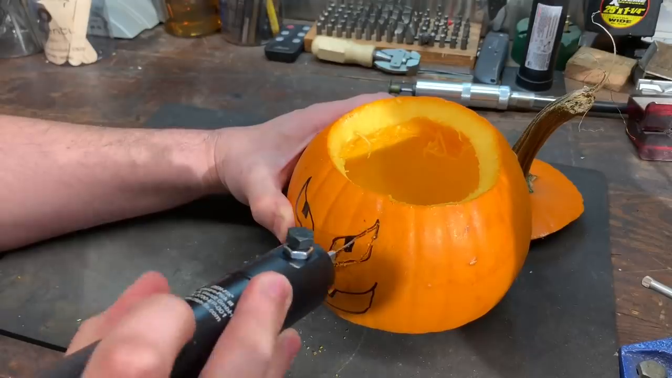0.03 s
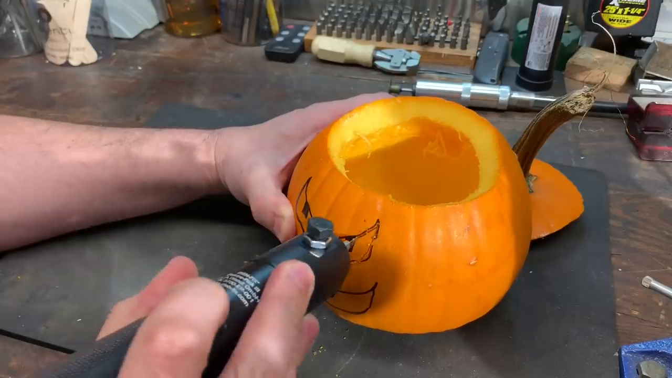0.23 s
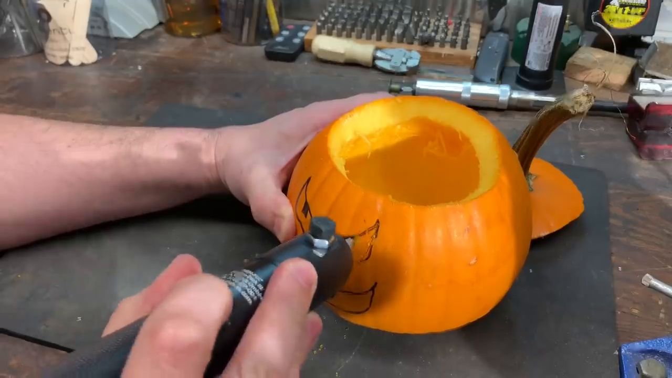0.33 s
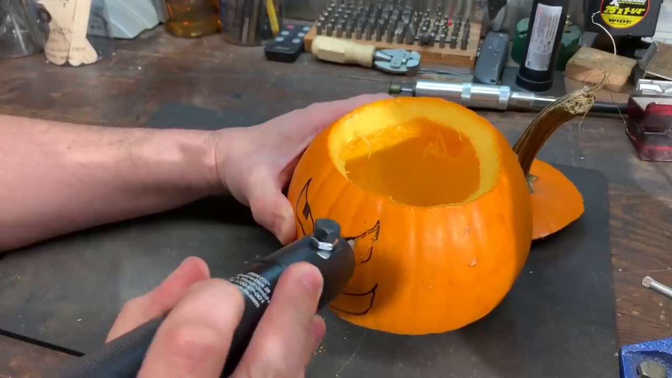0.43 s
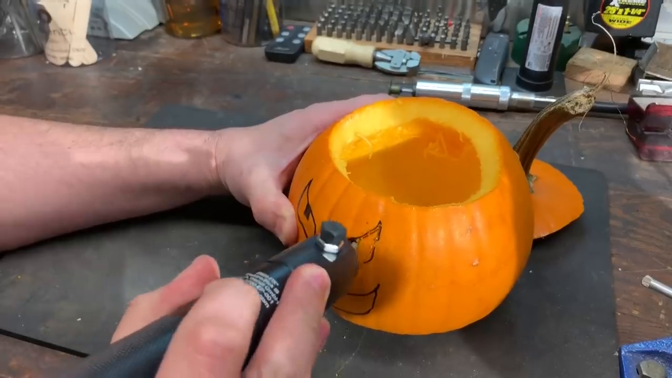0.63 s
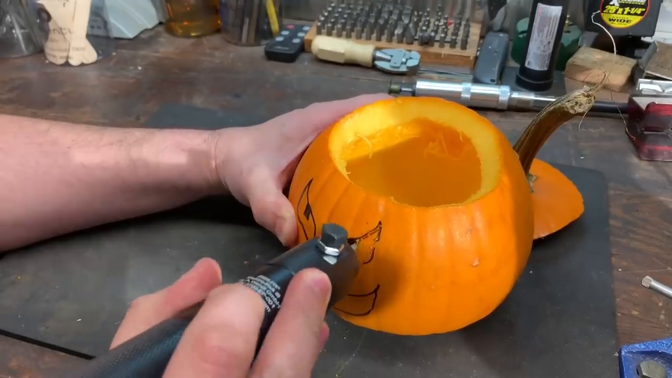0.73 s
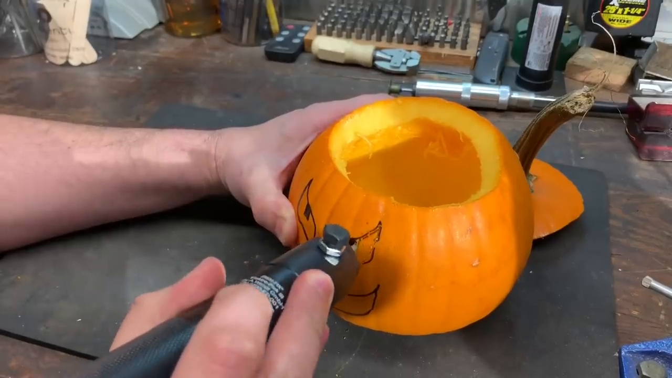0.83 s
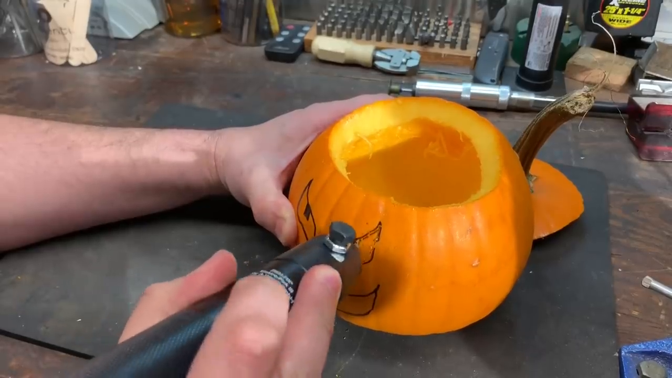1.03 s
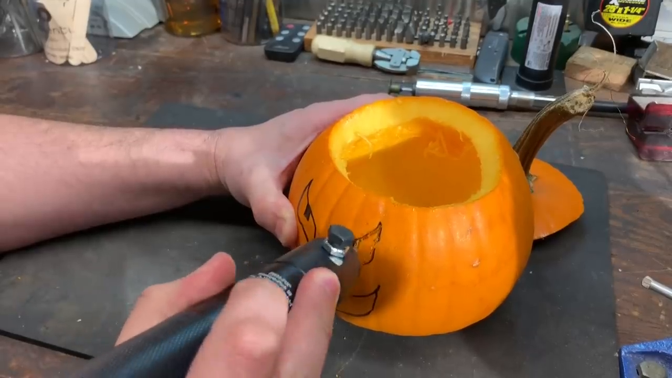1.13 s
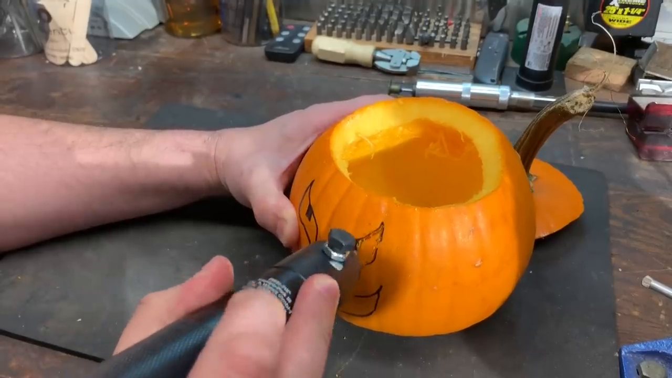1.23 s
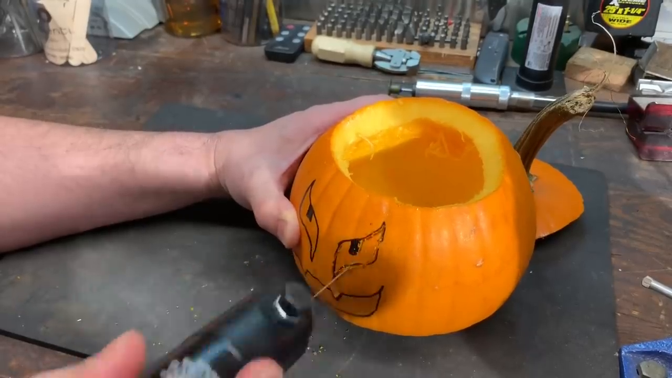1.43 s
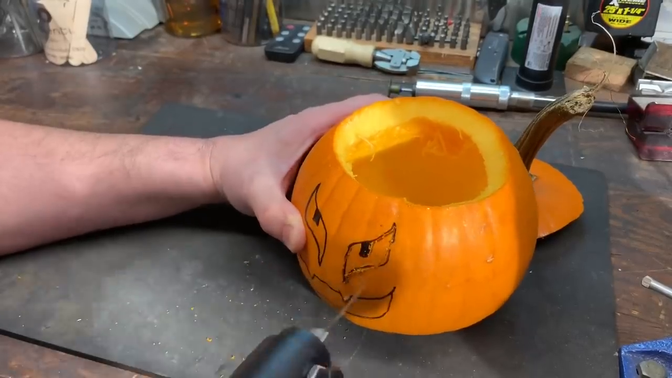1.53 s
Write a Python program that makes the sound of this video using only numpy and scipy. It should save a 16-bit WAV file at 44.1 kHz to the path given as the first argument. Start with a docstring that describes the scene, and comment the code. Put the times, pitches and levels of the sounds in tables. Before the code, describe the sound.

An electric pick gun buzzes and rattles for one second, its needle hammering into a hollow pumpkin.

```python
"""Electric pick gun in a pumpkin

An electric pick gun runs for one burst in a quiet workshop, its needle pressed into a pumpkin.
The striker mostly rattles loosely; three times it locks into a steady, higher, pitched buzz.
Rows of clicks and noise ring the plastic body, the steel needle and the hollow gourd; the steady
buzz is a sum of cosines. Mains hum, room noise, a hand rustle and a lingering low note lie below."""
import sys
import numpy as np
from scipy import signal
from scipy.fft import rfft, irfft, next_fast_len
from scipy.io import wavfile
from scipy.ndimage import uniform_filter1d

SR = 44100
rng = np.random.default_rng(int(sys.argv[2]) if len(sys.argv) > 2 else 0)


def transcribe(u):
    """Save the signal u as a 16-bit wav file named by the first command-line argument.

    u: samples, shape (n,) or (channels, n), limited to [-1, 1]; the rate is SR.
    q: integer samples, one column per channel.
    """
    v = np.clip(np.atleast_2d(u).T, -1, 1)
    q = np.round(v * 32767).astype(np.int16)
    wavfile.write(sys.argv[1], SR, q)


N = 68355

# resonances of the plastic body: f/Hz, width/Hz, level/dB
BODY = [(611, 25.7, 3.5), (796, 95, -8), (971, 113, 1.5), (1215, 81, 2.5), (1521, 119, 4),
        (2050, 230, -1.5), (2330, 278, -5), (2760, 720, -12), (3115, 160, -10)]
# resonances of the steel needle, the last one topmost: f/Hz, width/Hz, level/dB
NEEDLE = [(3484, 1900, -9), (4580, 1240, -5), (5974, 454, 1.5), (6730, 640, -2.5), (8240, 810, -3),
          (8970, 520, 0), (13630, 4000, -10.5)]
STOP_S = 1.235   # the trigger is let go
UPPER_RING_HZ = 7400   # the needle's upper resonances start here
NEEDLE_WANDER_DB = 2   # slow wander of most needle resonances


def amp(db):
    """Turn decibels into a factor on the wave."""
    return 10 ** (np.asarray(db) / 20)


def rms_one(x):
    """Scale a sound to an average (rms) strength of 1."""
    return x / np.sqrt(np.mean(x ** 2) + 1e-20)


def in_time(rows, before=None, after=None):
    """Draw straight lines between table rows, giving one curve per column after the time."""
    s, *columns = np.transpose(rows)
    return [np.interp(np.arange(N) / SR, s, c, before, after) for c in columns]


def noise():
    """White noise: every pitch equally strong."""
    return rng.standard_normal(N)


def drift(rate_hz):
    """Slow random wandering of rms 1: noise smoothed twice."""
    r = np.exp(-2 * np.pi * rate_hz / SR)
    slow = signal.lfilter([1], [1, -2 * r, r * r], rng.standard_normal(N + SR))
    return rms_one(slow[SR:])   # the first second lets the filter settle


def resonance(x, hz, width_hz):
    """One part that rings at its own pitch; a narrower width rings longer."""
    r = np.exp(-np.pi * width_hz / SR)
    feedback = [1, -2 * r * np.cos(2 * np.pi * hz / SR), r * r]
    return signal.lfilter([(1 - r * r) / 2, 0, (r * r - 1) / 2], feedback, x + 1e-18)


def ring(x, table, wander_db=0):
    """Resonances side by side, signs alternating, each able to wander slowly in level."""
    total = np.zeros(N)
    for k, (hz, width_hz, db) in enumerate(table):
        level = amp(db + wander_db * drift(9.0))
        total += (-1) ** k * level * resonance(x, hz, width_hz)
    return total


def sliding(x, hz, width_hz):
    """A resonance whose centre moves: shift it to zero, low-pass, shift back."""
    spin = np.exp(2j * np.pi * np.cumsum(hz) / SR)
    r = np.exp(-np.pi * width_hz / SR)
    return 2 * np.real(spin * signal.lfilter([1 - r], [1, -r], x / spin))


def evened(x):
    """Even out the loudness: divide by the level over a short time."""
    even_s = 0.016
    power = uniform_filter1d(x ** 2, int(even_s * SR))
    return x / np.sqrt(power + 1e-3 * np.mean(x ** 2))


def clicks(at, sizes):
    """Clicks placed between samples, each a short windowed sinc; at is counted in samples."""
    out, taps = np.zeros(N + 16), np.arange(-7, 9)
    keep = (at > 8) & (at < N)
    whole = np.floor(at[keep])[:, None]
    off = taps - (at[keep][:, None] - whole)
    shape = np.sinc(off) * np.cos(np.pi * off / 16) ** 2
    np.add.at(out, (whole + taps).astype(int), sizes[keep][:, None] * shape)
    return out[:N]


def room_noise():
    """Steady room noise: white noise weighted by pitch."""
    # spectrum before scaling: f/Hz, level per Hz/dB
    room_curve = [(12, 1), (22, -6), (45, -8.5), (95, -6.5), (135, -7.5), (200, -23), (330, -20.5),
                  (600, -22.5), (1000, -25.5), (2500, -34.5), (5000, -49), (11000, -69.5)]
    hz, db = np.transpose(room_curve)
    f = np.maximum(np.arange(N // 2 + 1) * SR / N, 1)
    weight = amp(np.interp(np.log(f), np.log(hz), db))
    return amp(-64) * rms_one(irfft(rfft(noise()) * weight, N))


def mains_hum():
    """Steady tones of mains hum, each a sine with a random start."""
    # f/Hz, rms level/dB
    hum_tones = [(240, -77), (480, -85), (720, -87.5), (960, -87), (2640, -87)]
    t = np.arange(N) / SR
    hum = np.zeros(N)
    for hz, db in hum_tones:
        hum += amp(db) * np.sqrt(2) * np.sin(2 * np.pi * (hz * t + rng.random()))
    return hum


def lingering_note():
    """A low note lingers after the burst: noise through two narrow resonances."""
    # t/s, level/dB
    fade = [(1.26, -46), (1.422, -62), (1.462, -59), (1.55, -65)]
    hz, width_hz = 140, 12
    drone = resonance(resonance(noise(), hz, width_hz), hz, 3 * width_hz)
    return amp(in_time(fade, -120)[0]) * rms_one(drone)


def hand_rustle():
    """The hand shifts on the tool: noise through two wandering resonances."""
    # swell and fade: t/s, level/dB
    swell = [(0.0, -82), (0.074, -67), (0.2, -98)]
    # resonances: f/Hz, width/Hz, level/dB
    rustle_rings = [(874, 150, -6), (1450, 130, 0)]
    rustle = rms_one(ring(noise(), rustle_rings, wander_db=3.5))
    return amp(in_time(swell, None, -120)[0]) * rustle


def shop(x):
    """Echoes of the workshop: eight feedback delays, duller on every round."""
    t60_s, wall_cut_hz = 0.12, 22000   # time to die away by 60 dB; treble cut of each round
    size = next_fast_len(N + SR)
    w = 2 * np.pi * np.arange(size // 2 + 1) / size
    dull = 1 / (1 + 1j * w * SR / (2 * np.pi * wall_cut_hz))
    echoes = 0
    for k, lag_s in enumerate(np.geomspace(.011, .031, 8)):
        one_round = amp(-60 * lag_s / t60_s) * dull * np.exp(-1j * w * lag_s * SR)
        echoes = echoes + (-1) ** k * one_round / (1 - one_round)
    return irfft(rfft(x, size) * echoes, size)[:N]


def striker():
    """Rate of blows and looseness (0 in step, 1 rattling) over time."""
    # one table per steady spell: t/s, blow rate f/Hz
    spells = [
        [(0.31, 379.9), (0.322, 391.3), (0.376, 388.2)],
        [(0.604, 360.2), (0.636, 375.4), (0.682, 362.5), (0.74, 367), (0.768, 346.1), (0.83, 343.7),
         (0.862, 349.2), (0.906, 337.5), (1.0, 341.4), (1.02, 324.1)],
        [(1.186, 401.6), (1.202, 405.2), (1.21, 390.7)],
    ]
    rattle_hz, run_down_hz_per_s = 241.72, 3100
    glide_s = .03   # the rate glides to and from a spell
    lock_in_s, loosen_s = 0.029, 0.014   # time to fall into step, and to lose it
    t = np.arange(N) / SR
    rows, distances = [], []
    for spell in spells:
        start, end = spell[0][0], spell[-1][0]
        rows += [(start - glide_s, rattle_hz), *spell, (end + glide_s, rattle_hz)]
        distances.append(np.maximum((start - t) / lock_in_s, (t - end) / loosen_s))
    hz, = in_time(rows)
    hz = np.maximum(hz - run_down_hz_per_s * np.maximum(t - STOP_S, 0), 60)
    return hz, np.clip(np.min(distances, axis=0), 0, 1)


def blows(cycles, hz, loose):
    """One blow and one rebound a cycle, uneven in timing when loose."""
    steady_jitter, loose_jitter = .0015, .15   # timing error as share of a cycle; the second adds on
    uneven_db, clump_db, clump_hz = .7, 0.96, 70   # chance in strength; drifting strength when loose
    bounce_lag, bounce_wander, bounce_db = .4, 0.024, -5.5   # lag and its wander as share of a cycle
    at = np.interp(np.arange(1, int(cycles[-1])), cycles, np.arange(N))
    i = at.astype(int)
    chance = rng.standard_normal((len(at), 4))
    period = SR / hz[i]
    jitter = steady_jitter + loose_jitter * loose[i]
    clump = clump_db * loose[i] * drift(clump_hz)[i]
    first = at + period * jitter * chance[:, 0]
    lag = bounce_lag + bounce_wander * drift(5.2)[i] + jitter * chance[:, 1]
    strikes = clicks(first, amp(clump + uneven_db * chance[:, 2]))
    rebounds = clicks(first + period * lag, amp(clump + bounce_db + uneven_db * chance[:, 3]))
    return strikes + rebounds


def gritty(hits, loose):
    """Each blow trails a short scrape of noise; loose blows and the run-down add a steady rub."""
    decay_s, steady_share, loose_share = 0.00091, .33, .8   # scrape decay; its share in step and loose
    rub_share, coast_s = .33, 0.14   # rub when loose; time in which it takes over after the stop
    r = np.exp(-1 / (decay_s * SR))
    scrape = rms_one(signal.lfilter([1], [1, -r], np.abs(hits)) * noise())
    share = np.clip(steady_share + (loose_share - steady_share) * loose, 0, 1)
    since_stop_s = np.maximum(np.arange(N) / SR - STOP_S, 0)
    rub = np.clip(rub_share * loose + since_stop_s / coast_s, 0, 1)
    struck_part = np.sqrt(1 - share ** 2) * rms_one(hits) + share * scrape
    return np.sqrt(1 - rub ** 2) * struck_part + rub * noise()


def gourd_thump(turn, loose):
    """The motor's turning shakes the gourd: a low tone, its strength noisy when loose."""
    noise_share, width_hz, low_cut_hz = .9, 40, 85
    smooth = signal.butter(2, width_hz, fs=SR, output="sos")
    shake = rms_one(signal.sosfilt(smooth, noise()))
    low_cut = signal.butter(4, low_cut_hz, "high", fs=SR, output="sos")
    return rms_one(signal.sosfilt(low_cut, turn * (1 + noise_share * loose * shake)))


def gourd_hollow(hits):
    """The blows ring the hollow gourd through two resonances at one pitch."""
    hz, width_hz = 236, 107
    return rms_one(resonance(resonance(evened(hits), hz, width_hz), hz, 2 * width_hz))


def needle_rings(rough, loose):
    """Lower and upper ring of the steel needle, driven by blows and, in step, extra rubbing."""
    # the brightest ring slides as the needle is pressed, the topmost swells and fades:
    # t/s, brightest ring f/Hz, topmost ring level/dB
    slide = [(0.6, 10000, 1), (0.64, 9300, 0), (0.686, 10870, -4), (0.76, 9900, 2.5), (0.86, 10100, 1),
             (0.9, 10100, -6.5), (1.0, 10340, -3.5), (1.04, 9760, 0.5)]
    slide_width_hz, slide_db = 770, 0.5
    rub = (1 - loose) * noise()
    low_modes = [m for m in NEEDLE if m[0] < UPPER_RING_HZ]
    lower = rms_one(ring(rough + .3 * rub, low_modes, wander_db=NEEDLE_WANDER_DB))
    rubbed = rough + .45 * rub
    slide_hz, top_db = in_time(slide)
    bright = amp(slide_db) * sliding(rubbed, slide_hz, slide_width_hz)
    top = amp(top_db) * ring(rubbed, NEEDLE[-1:])
    high_modes = [m for m in NEEDLE[:-1] if m[0] >= UPPER_RING_HZ]
    upper = bright + top + ring(rubbed, high_modes, wander_db=NEEDLE_WANDER_DB)
    return lower, rms_one(upper)


def struck(times, db, table):
    """Single blows, each a short crunch ringing the resonances to about a given peak level."""
    decay_s, noise_share = 0.0018, .35   # noise after the first contact
    n = SR // 100
    tail = noise_share * rng.standard_normal(n) * np.exp(-np.arange(n) / (decay_s * SR))
    crunch = np.r_[1, tail]
    unit_peak = np.abs(ring(np.r_[crunch, np.zeros(N - len(crunch))], table)).max()
    return ring(np.convolve(clicks(times * SR, amp(db)), crunch)[:N], table) / unit_peak


def hard_knocks():
    """Hard single blows ring needle and body together."""
    # t/s, peak level of the needle/dB, peak level of the body/dB
    knocks = [(0.219, -37.5, -39), (0.2423, -14, -12), (0.2553, -19, -22), (0.2667, -22.5, -48),
              (0.2867, -14.5, -16.5), (0.4385, -14, -24), (0.4766, -12, -18), (0.5104, -16.5, -26.5),
              (0.5308, -31, -20), (0.5594, -17.5, -21), (1.0309, -16.5, -13), (1.0839, -19, -25),
              (1.1210, -21, -18), (1.1124, -19, -21.5), (1.1415, -18, -26)]
    s, steel_db, plastic_db = np.transpose(knocks)
    return struck(s, steel_db, NEEDLE) + struck(s, plastic_db, BODY)


def last_ticks():
    """Last bright ticks as the motor runs down: crunches through two resonances at one pitch."""
    # t/s, peak level before the second resonance/dB
    ticks = [(1.2246, -19.5), (1.242, -37), (1.2458, -30), (1.2514, -25), (1.2572, -24.5), (1.2632, -28),
             (1.2726, -27), (1.2844, -55.5)]
    hz, width_hz = 9300, 500
    s, db = np.transpose(ticks)
    return resonance(struck(s, db, [(hz, width_hz, 0)]), hz, 4 * width_hz)


def steady_buzz(cycles):
    """Clean multiples of the blow rate, weighted by the grip; rms about 1."""
    # one row per grip, columns are multiples 1 to 9 of the blow rate: level/dB
    grips = [(-14, -6.5, 1.7, 2.5, -3.5, -13, -30.5, -23, -41.5),
             (-10.5, -4, -2, -4, -7, -11.5, -21, -19, -21),
             (-6.5, -8, 0.5, -7.5, -9.5, -8.5, -9.5, -22, -12.5),
             (-8, -21, -1, -9.5, -3, -10, -14, -20, -15.5), (-28.5, -7, 0, -6, -9, -20, -30.5, -23, -35)]
    # one value per grip: phase lag/rad, growing with the multiple squared
    grip_lag = [0.4, 0.706, .8, .9, 0.334]
    changes_s, change_s = [.5, 0.756, 0.904, 1.1], 0.025   # when the grip changes, how long it takes
    waver_db, flutter_db, flutter_hz = 1.5, 0.46, 70   # slow waver; fast flutter, more on high multiples
    edges = np.ravel([(s - change_s / 2, s + change_s / 2) for s in changes_s])
    # each grip holds from the end of one change to the start of the next
    held = np.repeat(np.c_[grip_lag, grips], 2, axis=0)[1:-1]
    smear, *levels = in_time(np.c_[edges, held])
    gains = np.array([amp(db + waver_db * drift(6.6) + flutter_db * k * drift(flutter_hz))
                      for k, db in enumerate(levels)])
    k = np.arange(len(gains))[:, None] + 1
    waves = gains * np.cos(2 * np.pi * k * cycles - smear * k ** 2)
    return np.sum(waves, axis=0) / np.sqrt(np.sum(gains ** 2, axis=0) / 2)


def body_clatter(rough, cycles, loose):
    """The plastic body: steady buzz while in step, ringing clatter while loose."""
    grit_db, rub_level = -20.5, 0.69   # clatter left under the buzz; rubbing noise in step
    driven = rough + rub_level * (1 - loose) * noise()
    clatter = np.sqrt(loose + amp(2 * grit_db)) * rms_one(ring(driven, BODY))
    return np.sqrt(1 - loose) * steady_buzz(cycles) + clatter


def pick_gun():
    """The striker's blows heard through body, needle and gourd."""
    # t/s, then level/dB of body, needle's lower ring, its upper ring, gourd's thump, its hollow note
    effort = [(0.2, -136, -99, -99, -103, -104), (0.218, -46, -66, -58, -35.5, -50.5),
              (0.248, -22.5, -31, -35.5, -38.5, -35), (0.36, -16.5, -38.5, -33.5, -55, -61),
              (0.386, -20, -29, -29.5, -57, -36), (0.412, -21.5, -31.5, -32, -43.5, -34.5),
              (0.568, -26.5, -39.5, -36.5, -36, -36), (0.644, -23, -36.5, -32.5, -57, -48),
              (0.732, -25, -36, -37.5, -58.5, -63), (0.91, -26, -37, -34.5, -65, -72),
              (1.014, -26, -38.5, -37.5, -66.5, -62.5), (1.04, -21, -29, -29.5, -65, -32.5),
              (1.088, -25.5, -36, -36.5, -36, -33), (1.156, -27, -41.5, -38, -36, -32.5),
              (1.204, -19, -36, -34.5, -48, -42.5), (1.242, -25.5, -44.5, -35.5, -57, -48.5),
              (1.262, -40, -46.5, -57, -60, -57), (1.36, -80, -92, -80, -65, -69)]
    # turns of the motor: t/s, f/Hz
    motor = [(0.3, 87.8), (0.44, 120.3), (0.66, 106.7), (0.966, 125.5), (1.12, 120.5)]
    hz, loose = striker()
    motor_hz, = in_time(motor)
    cycles = np.cumsum(hz) / SR
    turn = np.cos(2 * np.pi * np.cumsum(motor_hz) / SR)
    hits = blows(cycles, hz, loose)
    rough = evened(gritty(hits, loose))
    body_db, lower_db, upper_db, thump_db, hollow_db = in_time(effort, -120, -120)
    lower, upper = needle_rings(rough, loose)
    gourd = amp(thump_db) * gourd_thump(turn, loose) + amp(hollow_db) * gourd_hollow(hits)
    needle = amp(lower_db) * lower + amp(upper_db) * upper
    body = amp(body_db) * body_clatter(rough, cycles, loose)
    return gourd + needle + body + hard_knocks() + last_ticks()


def scene():
    """Background, gun and its echoes, the same on both channels."""
    background = room_noise() + mains_hum() + lingering_note() + hand_rustle()
    gun = pick_gun()
    return np.tile(background + gun + amp(-18) * shop(gun), (2, 1))


def record(dry):
    """One microphone with its hiss on both channels; a steep filter cuts the top."""
    hiss_db, cutoff_hz = -79.5, 15780
    hiss = amp(hiss_db) * noise()
    top_cut = signal.ellip(14, .5, 70, cutoff_hz, fs=SR, output="sos")
    return signal.sosfilt(top_cut, dry + hiss)


dry = scene()
out = record(dry)
transcribe(out)
```